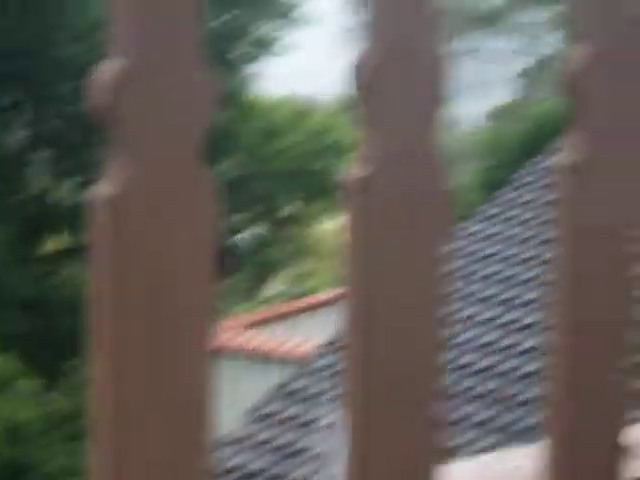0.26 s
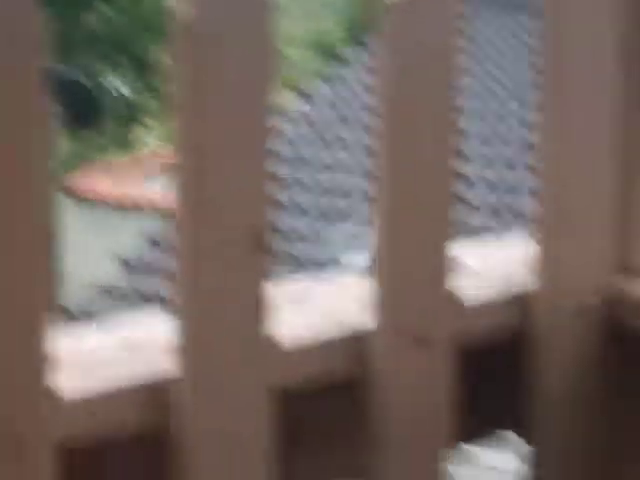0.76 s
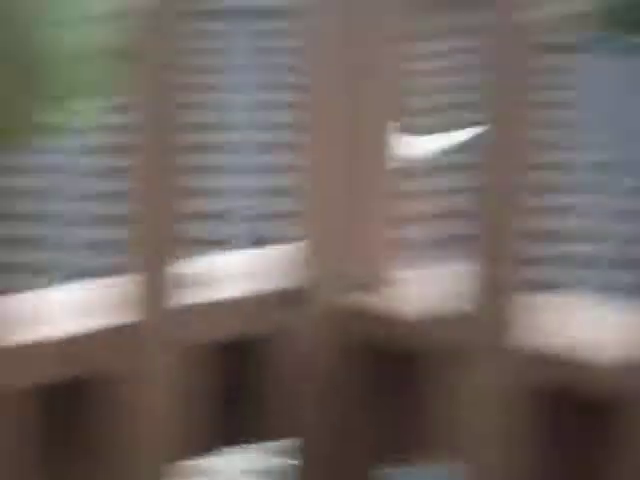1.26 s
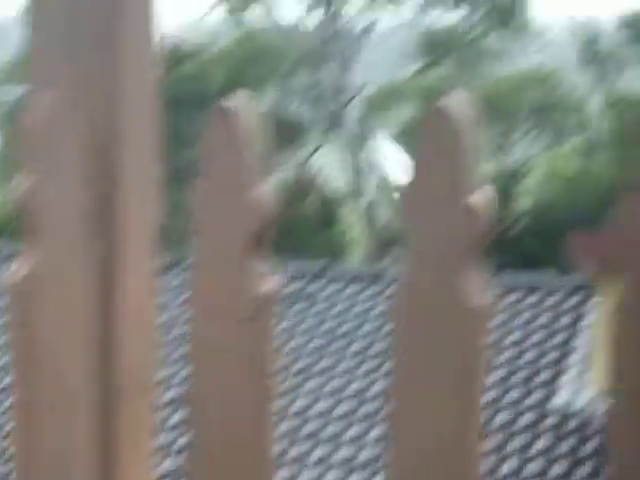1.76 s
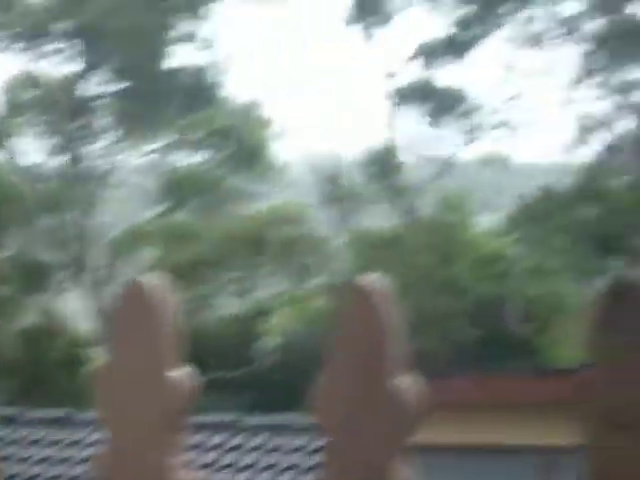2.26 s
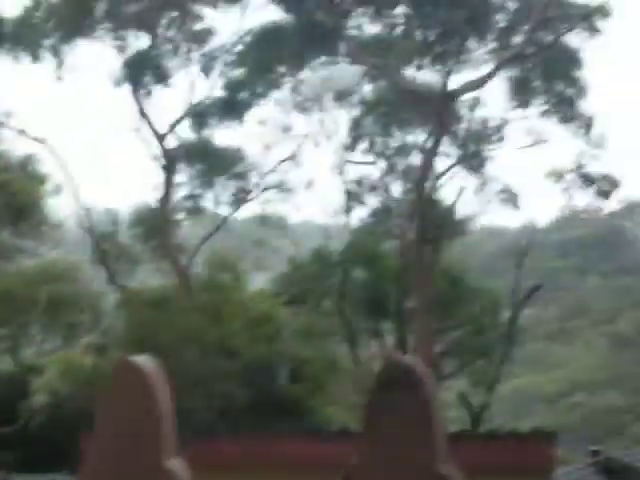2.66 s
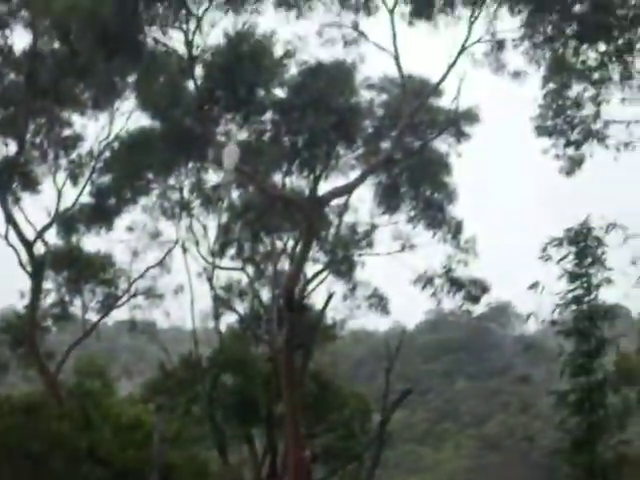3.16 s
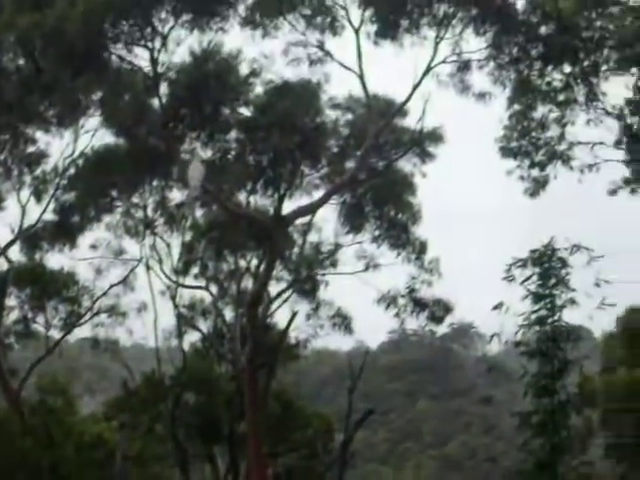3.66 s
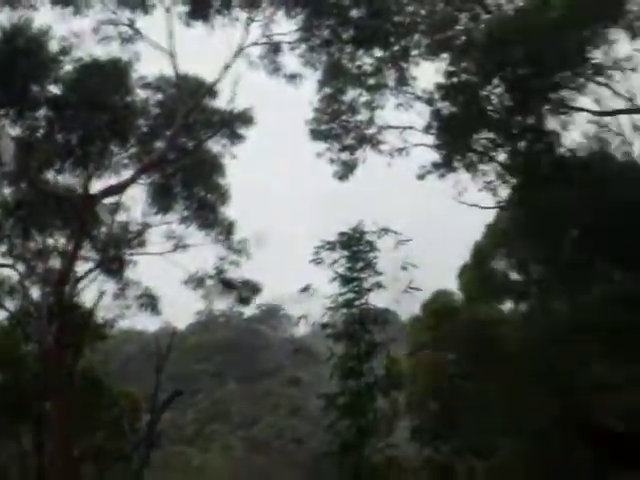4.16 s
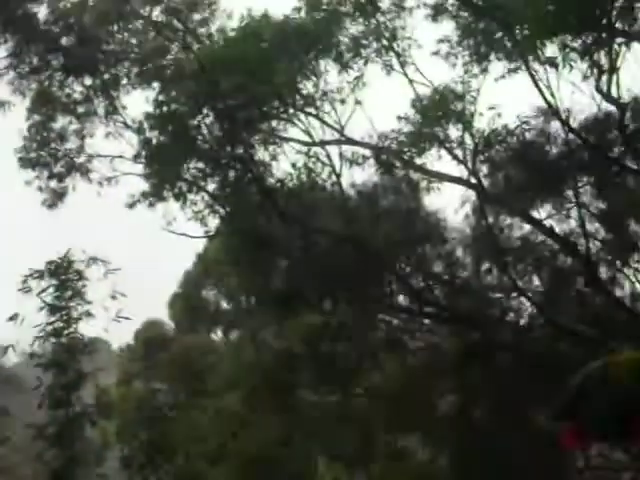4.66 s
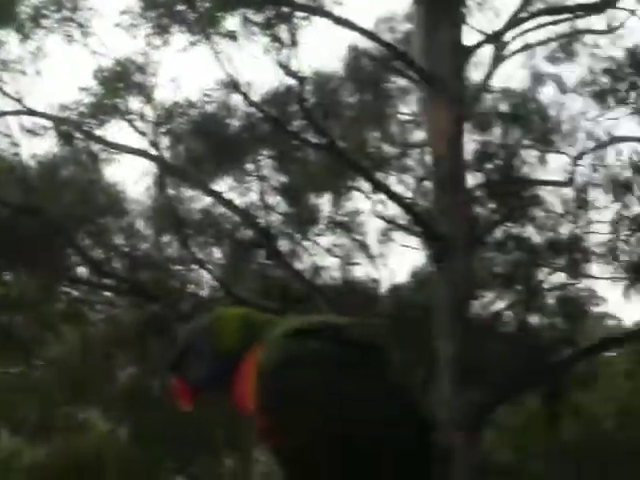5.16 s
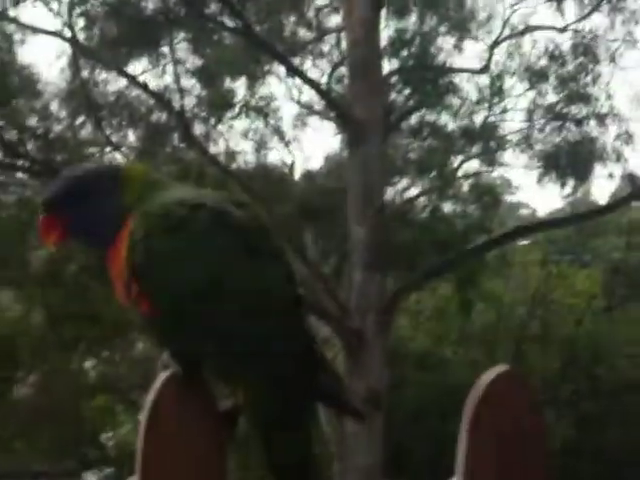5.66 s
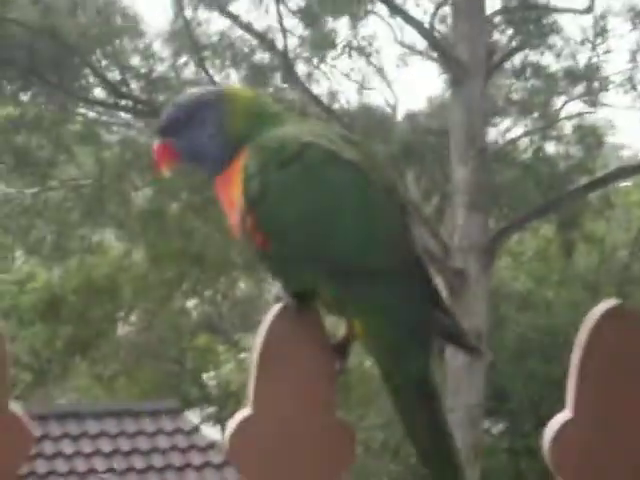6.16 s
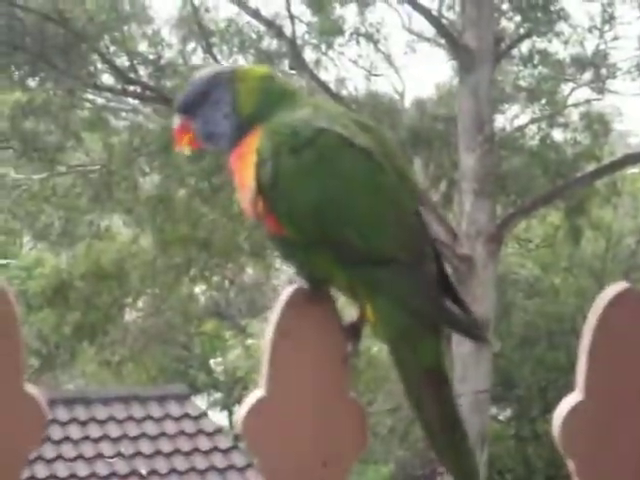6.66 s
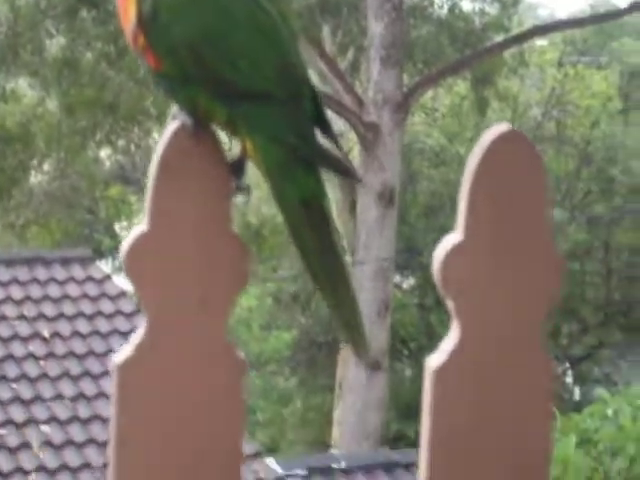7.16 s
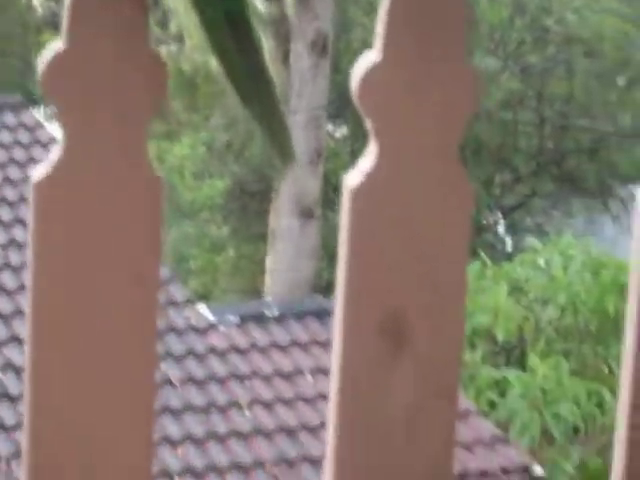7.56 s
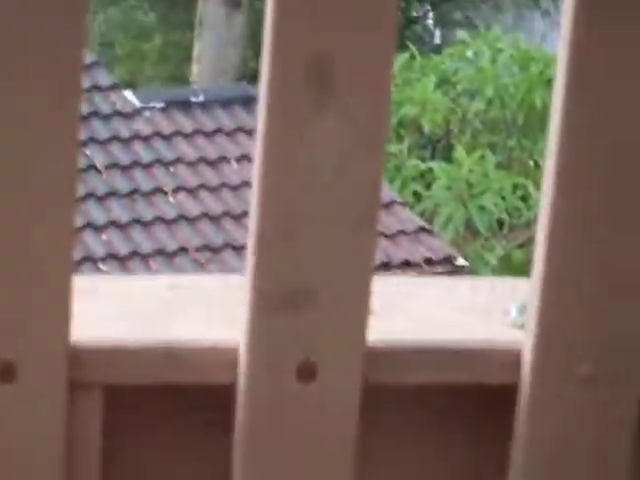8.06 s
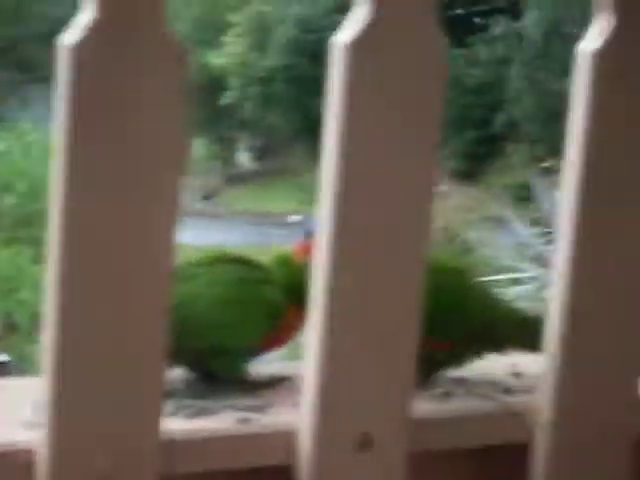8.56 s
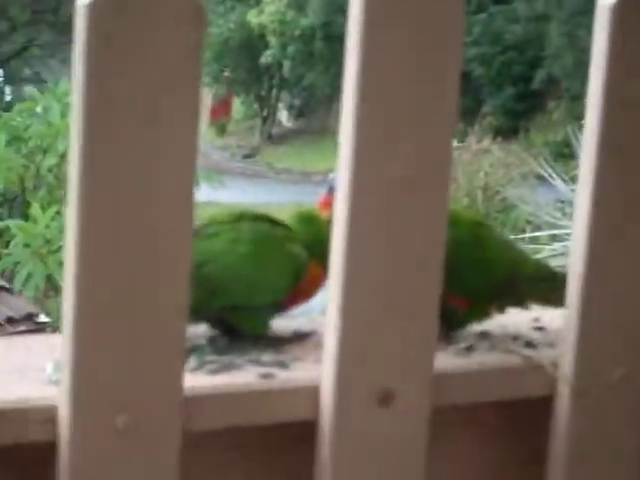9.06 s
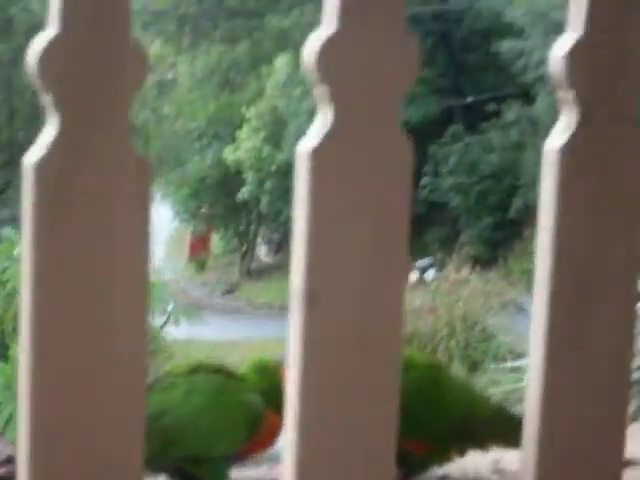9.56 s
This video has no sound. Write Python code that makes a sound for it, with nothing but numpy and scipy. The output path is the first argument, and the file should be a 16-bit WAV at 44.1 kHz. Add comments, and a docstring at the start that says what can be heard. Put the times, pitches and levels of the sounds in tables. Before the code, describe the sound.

A fenced deck among trees, close microphone, quiet airy hush with a very thin steady whine. At 0 s a cockatoo's loud, harsh, nearly chaotic screech is already under way, with wing whirr and a soft low air buffet; another lesser screech comes at 0.3 s, between throaty grumbles fading until 0.9. At 2.0-2.35 s a lorikeet gives a piercing whistle near 4 kHz. Soft pulsed wing flutter starts at 2.8 and recurs at 3.5 and 4.0; a hoarse rising call sounds at 3.7. From 4.9 small raspy peeps climb into a strained, catching squeal at 5.3-5.65, ended by a low rough scold to 5.85. A faint chirp follows, then a sharp seed crack at 6.3. Louder rising calls, each flicking down, come at 6.45 and 6.8. Tiny ticks scatter; a very faint distant screech passes around 8, and a last clear rising call at 8.6. Then near quiet. Quick fence echoes and a soft leafy tail.

```python
"""A fenced garden deck with parrots. A cockatoo screeches and grumbles as it flies off; lorikeets close by
whistle, peep, squeal, scold and give four rising calls: rough harmonic tones plus rasp, shaped by a throat.
Wings whirr as pulsed noise; seed cracks, beaks and claws on the rail are short bursts that ring.
Fence and house throw back quick echoes, the trees a soft tail. Soft buffets of moving air, filtered-noise
still air and a thin whine of steady sines lie beneath."""
import sys
import numpy as np
from scipy import signal
from scipy.fft import rfft, irfft, next_fast_len
from scipy.io import wavfile

SR = 44100
rng = np.random.default_rng(int(sys.argv[2]) if len(sys.argv) > 2 else 0)


def unload_wav(signal):
    """Save mono or channel-first audio to the path in sys.argv[1] as 16-bit WAV at rate SR, clipped to [-1, 1]."""
    wavfile.write(
        sys.argv[1],
        SR,
        np.round(np.clip(np.atleast_2d(signal).T, -1, 1) * 32767).astype(np.int16),
    )


N = 432621
TIME = np.arange(N) / SR
CUTOFF_HZ = 12000

# Rasp of peeps and squeal: (frequency [Hz], gain [dB])
SYRINX_RASP = [(470, -71), (800, -34), (1360, -11), (1910, -23), (2430, -22), (2940, -16), (3910, -7),
               (4900, -8), (5490, -5.5), (7450, -1.5), (7970, -9.5), (10200, -6), (12000, -30),
               (15600, -68), (22000, -120)]


def from_db(db):
    """Decibels to amplitude gain."""
    return 10 ** (np.asarray(db) / 20)


def rms_one(x):
    """Scale to unit power."""
    return x / np.sqrt(np.mean(x ** 2) + 1e-20)


def along(rows, t):
    """Columns of a curve, interpolated at times t."""
    time_s, *columns = np.transpose(rows)
    return [np.interp(t, time_s, column) for column in columns]


def gain_at(spectrum, hz):
    """Read a spectrum on a log-frequency axis; add a 12 dB/octave fall below its first point."""
    point_hz, point_db = np.transpose(spectrum)
    gain = from_db(np.interp(np.log(hz + 1), np.log(point_hz), point_db))
    return gain * np.minimum(hz / point_hz[0], 1) ** 2


def colour(x, spectrum):
    """Filter a signal by a spectrum."""
    size = next_fast_len(len(x))
    gain = gain_at(spectrum, np.fft.rfftfreq(size, 1 / SR))
    return irfft(rfft(x, size) * gain, size)[:len(x)]


def wobble(size, hz):
    """Random motion of spread 1, mostly below hz."""
    bins_hz = np.fft.rfftfreq(next_fast_len(size + SR // 10), 1 / SR)
    noise = rng.standard_normal(2 * len(bins_hz) - 2)
    return rms_one(irfft(rfft(noise) / (1 + (bins_hz / hz) ** 2))[:size])


def notes(table, bend, attack_s, release_s, edge_db, edge_rough):
    """Notes glide onto and off a held pitch, softer and rougher at the edges; (s, Hz, dB, roughness) curves."""
    u = np.linspace(0, 1, num=SR // 400)
    curves = []
    for start_s, length_s, opening_hz, held_hz, closing_hz, level_db, rough in table:
        glide_on = (opening_hz - held_hz) * (1 - u) ** bend
        glide_off = (closing_hz - held_hz) * u ** bend
        pitch_hz = held_hz + glide_on + glide_off
        attack = 1 - u * length_s / attack_s
        release = 1 - (1 - u) * length_s / release_s
        edge = np.clip(np.maximum(attack, release), 0, 1) ** 2
        curves.append(np.column_stack([start_s + u * length_s, pitch_hz,
                                       level_db - edge_db * edge, rough + edge_rough * edge]))
    return curves


def voice(calls, throat, rasp, jitter, jitter_hz, rasp_db, shimmer, side_ratio, side_depth, dulling=0):
    """A syrinx: harmonics that grow uneven and raspy with roughness; its other half beats against them."""
    out = np.zeros(N)
    for rows in calls:
        at = np.arange(max(int(rows[0][0] * SR), 0), int(rows[-1][0] * SR))
        size = len(at)
        pitch_hz, level_db, rough = along(rows, at / SR)
        rough = np.clip(rough, .02, 1)
        uneven_hz = pitch_hz * (1 + jitter * rough * wobble(size, jitter_hz))
        phase = 2 * np.pi * np.cumsum(uneven_hz) / SR
        tone = np.zeros(size)
        for k in range(1, int(CUTOFF_HZ / pitch_hz.min()) + 1):
            flutter = 1 + shimmer * rough * wobble(size, jitter_hz)
            softened = k ** (dulling * (level_db - level_db.max()))  # high harmonics need effort
            gain = gain_at(throat, k * pitch_hz) * (k * pitch_hz < CUTOFF_HZ)
            tone += softened * gain * flutter * np.cos(k * phase + rng.normal())
        # the second membrane puts side lines between the harmonics
        beating = np.cos(side_ratio * phase) * (1 + wobble(size, jitter_hz) / 2)
        tone = rms_one(tone) * (1 + side_depth * beating)
        # air escapes in a puff on every cycle
        puffs = rng.standard_normal(size) * (1 + np.cos(phase))
        hiss = rms_one(colour(puffs, rasp))
        share = from_db(rasp_db) * rough
        fade = np.minimum(np.minimum(at - at[0], at[-1] - at) / (.003 * SR), 1)
        out[at] += from_db(level_db) * fade * (tone + share * hiss) / np.sqrt(1 + share ** 2)
    return out


def cockatoo(lowest_hz=480):
    """Harsh, nearly chaotic screeches and softer grumbles; another screech, dulled by distance."""
    # screeches: (start [s], length [s], opening [Hz], held [Hz], closing [Hz], level [dB], roughness [0-1])
    screech_notes = [(-.04, 0.11, 1036, 1211, 1226, -19, 0.9), (.265, .17, 880, 999.3, 917, -25.5, .7)]
    # grumbles: (start [s], length [s], opening [Hz], held [Hz], closing [Hz], level [dB], roughness [0-1])
    grumble_notes = [(.11, 0.046, 875, 827, 750, -36.5, 0.66), (.15, 0.094, 1022, 1168, 904, -35.5, 0.53),
                     (.245, 0.047, 930, 870, 830, -40.5, 0.33), (.40, 0.13, 907, 888, 819, -41.5, 0.39),
                     (.567, .045, 898, 802, 768, -40, 0.93), (.703, .125, 719.6, 821, 661.5, -45, 0.28),
                     (.835, 0.032, 694, 697, 660, -45, 0.78)]
    # far down the valley: (start [s], length [s], opening [Hz], held [Hz], closing [Hz], level [dB],
    # roughness [0-1])
    far_notes = [(7.76, .64, 957, 1000, 921, -68, 0.99)]
    # screech throat and rasp: (frequency [Hz], gain [dB])
    screech_throat = [(350, -49.5), (600, -24), (907, -13.5), (1460, -15), (1760, -17.5), (2410, -6.5),
                      (3140, -10.5), (3470, -4.5), (3930, 2.5), (4240, -25), (4930, 1.5), (7260, -16.5),
                      (8440, -10), (10100, -18.5), (12000, -44), (15600, -81.5), (22000, -120)]
    # grumble throat and rasp: (frequency [Hz], gain [dB])
    grumble_throat = [(350, -31), (600, -3.5), (907, -3), (1150, -5), (1420, -8.5), (1720, -2), (2260, -4),
                      (3300, -11), (4180, -16), (7080, -17), (9450, -19.5), (12000, -62), (15600, -80),
                      (22000, -120)]
    # distant throat and rasp: (frequency [Hz], gain [dB])
    far_throat = [(1000, -15), (1750, -1), (2100, 5.5), (3000, 3.5), (4000, -8.5), (6000, -37),
                  (12000, -57)]
    harsh = notes(screech_notes, bend=2.8, attack_s=.044, release_s=.05, edge_db=21, edge_rough=.05)
    soft = notes(grumble_notes, bend=2.2, attack_s=.02, release_s=.045, edge_db=10, edge_rough=.2)
    distant = notes(far_notes, bend=7.5, attack_s=.36, release_s=.1, edge_db=6, edge_rough=.085)
    screech = voice(harsh, screech_throat, screech_throat, jitter=.05, jitter_hz=150, rasp_db=0,
                    shimmer=1.1, side_ratio=.5, side_depth=.2)
    grumble = voice(soft, grumble_throat, grumble_throat, jitter=.09, jitter_hz=110, rasp_db=-3,
                    shimmer=1.3, side_ratio=.5, side_depth=.12, dulling=.03)
    far = voice(distant, far_throat, far_throat, jitter=.06, jitter_hz=150, rasp_db=6,
                shimmer=1, side_ratio=.5, side_depth=.2)
    highpass = signal.butter(2, lowest_hz, "high", fs=SR, output="sos")
    return signal.sosfilt(highpass, screech + grumble + far)


def climb(start_s, length_s, opening_hz, top_hz, climb_s, level_db, rough):
    """Pitch eases up from a scoop, level follows, then both flick down; an (s, Hz, dB, roughness) curve."""
    scoop, scoop_s = .101, .00793  # share of pitch, decay time
    attack_s, attack_db, db_per_octave = .024, 19.5, 24
    hoarse_start, hoarse_s = .55, .05  # added roughness, clearing time
    flick_s, flick_drop, flick_rough, flick_db = .026, .2, .47, 4  # drop is a share of pitch
    t = np.linspace(0, length_s, num=SR // 200)
    flick = np.clip(1 - (length_s - t) / flick_s, 0, 1) ** 2
    pitch_hz = top_hz + (opening_hz - top_hz) * np.exp(-t / climb_s)
    pitch_hz = pitch_hz * (1 - scoop * np.exp(-t / scoop_s))
    level = level_db + db_per_octave * np.log2(pitch_hz / top_hz)
    level = level - attack_db * np.maximum(1 - t / attack_s, 0) - flick_db * flick
    roughness = rough + hoarse_start * np.exp(-t / hoarse_s) + flick_rough * flick
    return np.column_stack([start_s + t, pitch_hz * (1 - flick_drop * flick), level, roughness])


def rising_calls():
    """A lorikeet close by: each call starts hoarse, clears as it climbs and ends in a downward flick."""
    # calls: (start [s], length [s], opening [Hz], top [Hz], climb time [s], level [dB],
    # roughness once clear [0-1])
    calls = [(3.676, 0.18, 973, 1479, 0.043, -29.5, 0.08), (6.452, 0.2, 991, 1434, 0.095, -24, 0.08),
             (6.771, .21, 1088, 1498, .083, -21.5, 0), (8.596, .25, 1006, 1433, 0.051, -21.5, 0)]
    # throat: (frequency [Hz], gain [dB])
    throat = [(850, -19), (1150, -16), (1320, -10), (1420, -3), (2050, -6), (2400, -6), (2830, -3),
              (3300, -7), (4150, 1), (4800, -10), (5650, -1), (6300, -7), (8700, -7), (10000, -13),
              (10900, -33), (12000, -38)]
    # rasp: (frequency [Hz], gain [dB])
    rasp = [(1200, -29), (2300, 0), (4000, 6.5), (6000, -11), (9500, -2), (12000, -29)]
    return voice([climb(*call) for call in calls], throat, rasp, jitter=.046, jitter_hz=260, rasp_db=-14,
                 shimmer=1.15, side_ratio=.27, side_depth=.02, dulling=.035)


def piercing_whistle():
    """A lorikeet's high whistle, purest where loudest."""
    # pitch and level curve: (time [s], pitch [Hz], level [dB])
    curve = [(1.992, 4100, -43.5), (2.01, 4160, -31), (2.054, 3935, -40.5), (2.084, 4270, -35),
             (2.096, 4290, -25), (2.158, 4381, -24), (2.288, 4346, -25), (2.336, 4020, -32),
             (2.348, 4300, -35.5), (2.36, 3986, -66)]
    # throat: (frequency [Hz], gain [dB])
    throat = [(3500, -17.5), (4280, -23.5), (4400, -5.5), (7000, -14.5), (8200, 5.5), (8700, 4.5),
              (10000, -9.5), (12500, -45)]
    # rasp: (frequency [Hz], gain [dB])
    rasp = [(900, -24), (2300, -23), (3200, -14), (4500, -1.5), (5500, -11.5), (6400, 2.5), (7600, -4.5),
            (8400, -4), (9100, -3.5), (9700, -3), (10600, -26), (12000, -38.5)]
    hoarse_db, clearing = -34.5, 1.77  # fully rough below this level; dB of roughness lost per dB above
    rows = []
    for time_s, pitch_hz, level_db in curve:
        rough = min(from_db(clearing * (hoarse_db - level_db)), 1)
        rows.append((time_s, pitch_hz, level_db, rough))
    return voice([rows], throat, rasp, jitter=.02, jitter_hz=200, rasp_db=2.5,
                 shimmer=.7, side_ratio=.258, side_depth=.09)


def peeps():
    """Short raspy peeps open the quarrel and climb towards the squeal; fainter chirps come from the trees."""
    # peeps: (start [s], length [s], opening [Hz], held [Hz], closing [Hz], level [dB], roughness [0-1])
    near_notes = [(4.874, 0.051, 2000, 2100, 2005, -50, 0.24),
                  (5.005, 0.081, 2012, 2110, 2170, -57.5, 0.26),
                  (5.085, 0.051, 2210, 2100, 2000, -51, 0.24), (5.135, 0.044, 2120, 2284, 2250, -49, 0.18),
                  (5.178, .06, 2288, 2334, 2430, -37, 0.48), (5.238, 0.16, 2366, 2453, 2477, -41, 0.46)]
    # tree chirps: (start [s], length [s], opening [Hz], held [Hz], closing [Hz], level [dB],
    # roughness [0-1])
    tree_notes = [(5.945, .095, 2600, 2710, 3010, -60.5, 0.23), (8.118, .16, 3880, 4110, 4240, -71.5, .08)]
    # throat: (frequency [Hz], gain [dB])
    throat = [(1000, 48), (2200, 15.5), (4700, 11), (7000, 1.5), (9700, 5.5), (11000, -42)]
    curves = notes(near_notes + tree_notes, bend=2.5, attack_s=.016, release_s=.02, edge_db=8, edge_rough=.1)
    return voice(curves, throat, SYRINX_RASP, jitter=.05, jitter_hz=90, rasp_db=-10,
                 shimmer=1.8, side_ratio=.25, side_depth=.2, dulling=.025)


def squeal():
    """A squeal that catches once: two overlapping notes with very rough edges."""
    # notes: (start [s], length [s], opening [Hz], held [Hz], closing [Hz], level [dB], roughness [0-1])
    squeal_notes = [(5.311, 0.062, 2573, 2480, 2590, -30, 0.15),
                    (5.365, .30, 2456, 2527, 2258, -31.5, 0.22)]
    # throat: (frequency [Hz], gain [dB])
    throat = [(1200, -20), (2500, -39), (3750, -7), (5000, 14), (7500, 20), (10000, -0.5), (12000, -25)]
    curves = notes(squeal_notes, bend=3.2, attack_s=.033, release_s=.04, edge_db=15, edge_rough=.96)
    return voice(curves, throat, SYRINX_RASP, jitter=.028, jitter_hz=130, rasp_db=3.5,
                 shimmer=1.6, side_ratio=.21, side_depth=.04)


def scold():
    """A low, rough note ends the quarrel."""
    # note: (start [s], length [s], opening [Hz], held [Hz], closing [Hz], level [dB], roughness [0-1])
    scold_notes = [(5.668, .175, 1090, 1285, 1345, -36, 0.73)]
    # throat and rasp: (frequency [Hz], gain [dB])
    throat = [(410, -82), (700, -48), (770, -54), (1060, -19.5), (1330, -19.5), (1430, -3), (1630, -50),
              (2140, -3.5), (2650, -14), (2910, -26), (3480, -9.5), (4070, -23), (5160, -19), (9450, -29.5),
              (12000, -78), (15600, -88), (22000, -120)]
    curves = notes(scold_notes, bend=1.8, attack_s=.031, release_s=.031, edge_db=23, edge_rough=.12)
    return voice(curves, throat, throat, jitter=.06, jitter_hz=220, rasp_db=0,
                 shimmer=.7, side_ratio=.5, side_depth=.06)


def split_tones():
    """Under strain the syrinx splits: low and high second tones sound around whistle and quarrel."""
    # low tones: (start [s], length [s], opening [Hz], held [Hz], closing [Hz], level [dB], roughness [0-1])
    low_notes = [(2.07, 0.12, 1072, 1166, 1124, -56, 0.084), (2.285, 0.096, 1123, 1167, 884, -58.5, 0.39),
                 (5.028, 0.059, 867, 902, 1024, -53.5, 0.39), (5.221, .025, 1330, 1260, 1400, -44.5, 0.89),
                 (5.305, 0.1, 1336, 1380, 1407, -46.5, 0.5), (5.39, 0.3, 1567, 1748, 1443, -59.5, 0.53),
                 (5.635, 0.032, 1160, 1066, 950, -46.5, 0.46), (5.73, 0.087, 1290, 1348, 1355, -47, 0.062)]
    # high tones: (start [s], length [s], opening [Hz], held [Hz], closing [Hz], level [dB], roughness [0-1])
    high_notes = [(1.993, 0.076, 4380, 4280, 4270, -37, 0.099), (2.03, 0.078, 3100, 3080, 3070, -53, 0.85),
                  (2.285, .07, 3180, 3150, 3060, -48, 0.24), (5.38, 0.12, 3227, 3312, 3460, -49, 0.5),
                  (5.45, 0.18, 3660, 3840, 3040, -49.5, 0.13)]
    # low throat and rasp: (frequency [Hz], gain [dB])
    low_throat = [(800, 6.5), (1700, 6), (2300, -10.5), (3300, -4.5), (5000, -14.5), (11000, -36.5)]
    # high throat and rasp: (frequency [Hz], gain [dB])
    high_throat = [(2500, -0.5), (4500, 0), (6000, -29), (11000, -41.5)]
    low_curves = notes(low_notes, bend=2.5, attack_s=.0099, release_s=.03, edge_db=13, edge_rough=.2)
    high_curves = notes(high_notes, bend=3.2, attack_s=.0074, release_s=.065, edge_db=17, edge_rough=.18)
    low = voice(low_curves, low_throat, low_throat, jitter=.082, jitter_hz=196, rasp_db=-19,
                shimmer=1, side_ratio=.76, side_depth=.14)
    high = voice(high_curves, high_throat, high_throat, jitter=.06, jitter_hz=150, rasp_db=-14,
                 shimmer=1.4, side_ratio=.61, side_depth=.072)
    return low + high


def ticks(crunch_s=.0026, level_db=-3, crack_db=-5):
    """A tick is a tiny burst of fractures: a dry crack, and the ring it leaves in husk and rail."""
    # seed cracks, beak and claw ticks: (time [s], level before level_db [dB], brightness [dB per decade])
    events = [(2.783, -42, 46), (6.12, -48, -25), (6.308, -22, -2), (6.3112, -14, 17.5), (6.314, -25, -21),
              (6.34, -37, -16), (7.155, -50, -50), (7.211, -42.5, 35), (7.327, -47, -43), (7.80, -54, 2),
              (8.085, -47.5, -7), (8.405, -53, 9), (9.126, -47, 28), (9.44, -51, -29)]
    # ring modes: (frequency [Hz], gain [dB], t60 [s])
    modes = [(800, -21, .022), (1550, -15, .022), (2900, -6, .008), (3700, -1, .009), (4300, -4, .012),
             (6450, -5, .016), (8400, -19, .005), (9600, -19, .005)]
    # dry crack: (frequency [Hz], gain [dB])
    crack_colour = [(450, -19), (900, -5), (4000, 0), (9000, -9), (11000, -22), (12000, -30)]
    out = np.zeros(N)
    t = TIME[:SR // 12]
    for start_s, tick_db, bright_db in events:
        burst = rng.standard_normal(len(t)) * np.exp(-t / crunch_s)
        # brightness tilts both ring and crack
        ring = np.zeros(len(t))
        for hz, db, t60_s in modes:
            decay = from_db(db + bright_db * np.log10(hz) - 60 * t / t60_s)
            ring += decay * np.sin(2 * np.pi * hz * t + rng.uniform(0, 2 * np.pi))
        tilted = [(hz, db + bright_db * np.log10(hz)) for hz, db in crack_colour]
        crack = rms_one(colour(burst, tilted)) * (t < t[-1] / 2)
        tick = rms_one(signal.fftconvolve(burst, ring)[:len(t)]) + from_db(crack_db) * crack
        start = int(start_s * SR)
        out[start:start + len(t)] += from_db(tick_db + level_db) * tick / np.abs(tick).max()
    return out


def swells(table):
    """Gain over time of gusts that each rise, then fade steadily in dB."""
    gain = np.zeros(N)
    for start_s, rise_s, level_db, fade_db_per_s in table:
        rise = np.clip((TIME - start_s) / rise_s, 0, 1)
        fading_s = np.maximum(TIME - start_s - rise_s, 0)
        gain += rise * from_db(level_db - fade_db_per_s * fading_s)
    return gain


def wings(beats_per_s=31, puff_db=2.5, swish_db=-.5):
    """Each beat of the feathers is a dull puff of air with a lighter, crackling swish."""
    # bouts: (start [s], rise [s], level before puff_db and swish_db [dB], fade [dB/s])
    bouts = [(-.03, 0.026, -51.5, 29), (2.78, 0.045, -62, 16), (2.885, 0.07, -57, 13),
             (3.49, 0.11, -59.5, 71), (3.99, 0.022, -61, 24.5)]
    # puff: (frequency [Hz], gain [dB])
    puff_colour = [(25, 2.5), (80, -7), (150, -9.5), (300, -8), (480, -2), (950, -5.5), (1400, -13.5),
                   (2500, -16), (6000, -40)]
    # swish: (frequency [Hz], gain [dB])
    swish_colour = [(1200, 6), (2000, -1.5), (3000, 0.5), (4300, 0), (5600, -2.5), (7500, -2.5),
                    (9700, -2.5), (11000, -17), (12000, -40.5)]
    rate_hz = beats_per_s * (1 + .1604 * wobble(N, 7.8))
    beat = np.cos(2 * np.pi * np.cumsum(rate_hz) / SR)
    flutter_db = 4.3 * beat + 2.6 * wobble(N, 22)
    puff = rms_one(colour(rng.standard_normal(N), puff_colour) * from_db(flutter_db))
    crackle_db = 2.4 * beat + 2.1 * wobble(N, 25) + 2 * wobble(N, 300)
    swish = rms_one(colour(rng.standard_normal(N) * from_db(crackle_db), swish_colour))
    return swells(bouts) * (from_db(puff_db) * puff + from_db(swish_db) * swish)


def buffets():
    """Moving air thumps softly on the microphone: low-weighted noise in short swells."""
    # swells: (start [s], rise [s], level [dB], fade [dB/s])
    thumps = [(-.02, 0.018, -56, 39.5), (5.68, .025, -66, 130), (7.745, 0.027, -63, 349.5)]
    # spectrum: (frequency [Hz], gain [dB])
    thump_colour = [(25, -4.5), (50, -5), (90, -9.5), (140, -6.5), (250, -14.5), (600, -30.5),
                    (3000, -71.5)]
    return swells(thumps) * rms_one(colour(rng.standard_normal(N), thump_colour))


def garden(x, near_db, far_db, near_t60_s=.28, far_t60_s=.51, leaf_hz=7000):
    """A few hard echoes, dense scatter from the pickets, and a duller tail from the trees."""
    # reflections off boards, fence and house: (delay [s], gain re direct [dB])
    echoes = [(.0023, -14), (.0061, -17.5), (0.0107, -5), (0.0175, -18)]
    t = TIME[:SR]
    near = rng.standard_normal(SR) * from_db(-60 * t / near_t60_s) * (t > .004)
    leaves = signal.butter(1, leaf_hz, fs=SR, output="sos")
    far = signal.sosfilt(leaves, rng.standard_normal(SR))
    far = far * from_db(-60 * t / far_t60_s) * np.minimum(t / .023, 1)
    response = (from_db(near_db) * rms_one(near) + from_db(far_db) * rms_one(far)) / np.sqrt(SR)
    response[0] += 1  # direct sound
    for delay_s, echo_db in echoes:
        response[int(delay_s * SR)] += from_db(echo_db)
    return signal.fftconvolve(x, response / np.linalg.norm(response))[:N]


def background(air_db=-65.5):
    """Still air among the trees, as slightly wavering noise, and a thin whine of steady sines."""
    # air spectrum: (frequency [Hz], relative density [dB per Hz])
    air_colour = [(15, -43.5), (25, -4), (45, -4), (112, -7.5), (161, -4), (243, -12), (322, -3),
                  (407, -11), (440, -1.5), (527, -7.5), (1480, -15), (2900, -10.5), (5670, -21),
                  (7930, -19), (12000, -36.5), (15600, -67.5), (22000, -120)]
    # whine: (frequency [Hz], level [dB rms])
    whine_lines = [(447, -79.5), (5087, -85.5), (7644, -78), (8812, -80.5), (10174, -89.5)]
    air = rms_one(colour(rng.standard_normal(N), air_colour)) * from_db(air_db + wobble(N, 3.2) / 2)
    whine = np.zeros(N)
    for hz, db in whine_lines:
        whine += from_db(db) * np.sqrt(2) * np.sin(2 * np.pi * hz * TIME)
    return air + whine


def scene():
    """The birds' voices echo in the garden; ticks, wings, buffets and background stay dry."""
    quarrel = peeps() + squeal() + scold()
    lorikeets = piercing_whistle() + quarrel + split_tones()
    birds = garden(cockatoo(), near_db=-9, far_db=-17)
    birds += garden(lorikeets, near_db=-8.5, far_db=-18.5)
    birds += garden(rising_calls(), near_db=-10, far_db=-24)
    return (birds + ticks() + wings() + buffets() + background())[None]


def record(dry):
    """Cut the top steeply with an elliptic low-pass."""
    lowpass = signal.ellip(10, .1, 80, CUTOFF_HZ, fs=SR, output="sos")
    return signal.sosfilt(lowpass, dry)


dry = scene()
out = record(dry)
unload_wav(out)
```